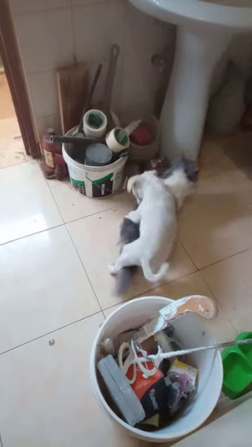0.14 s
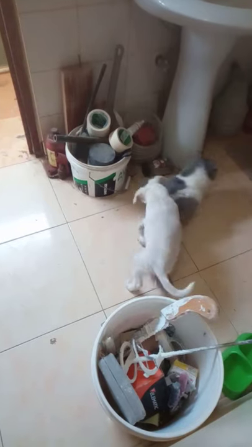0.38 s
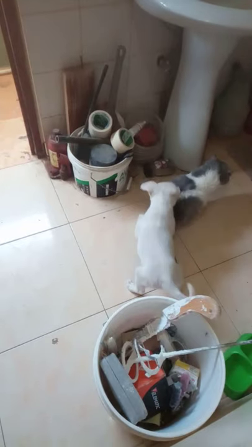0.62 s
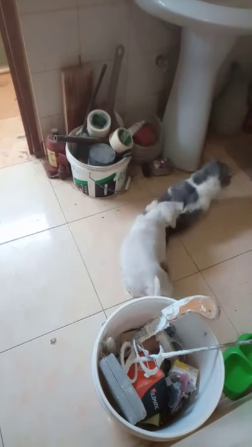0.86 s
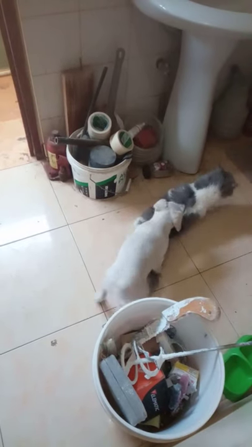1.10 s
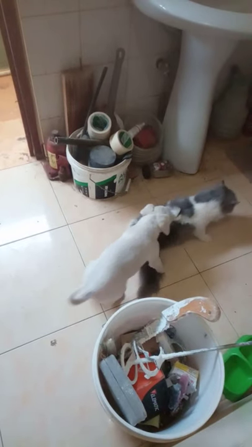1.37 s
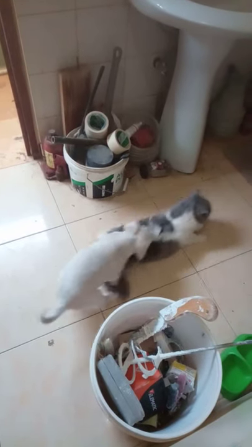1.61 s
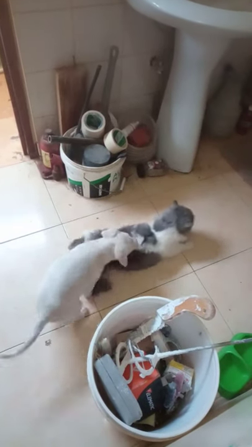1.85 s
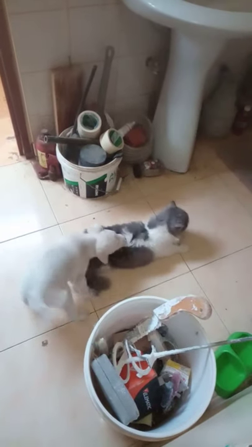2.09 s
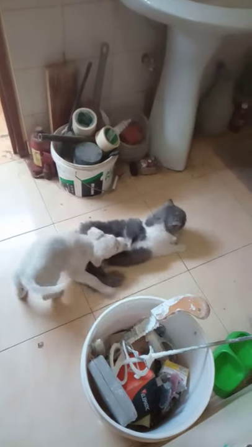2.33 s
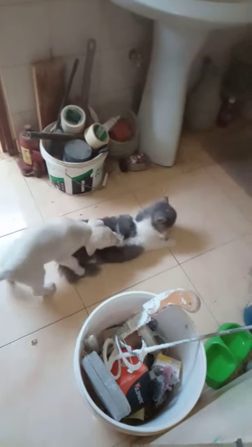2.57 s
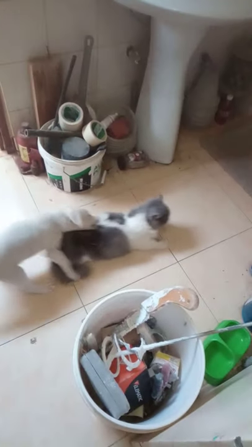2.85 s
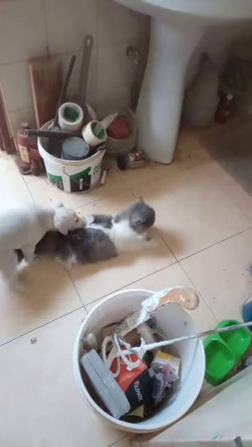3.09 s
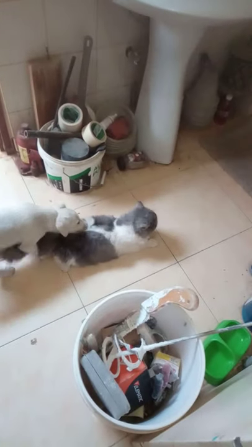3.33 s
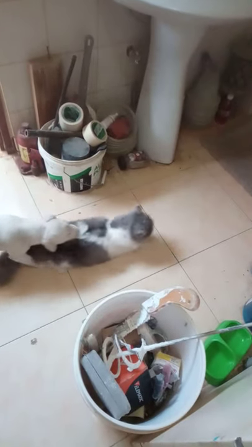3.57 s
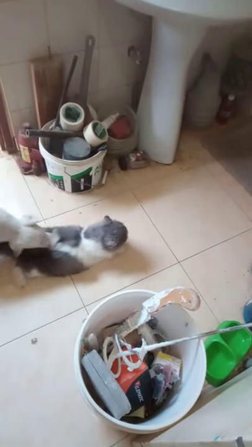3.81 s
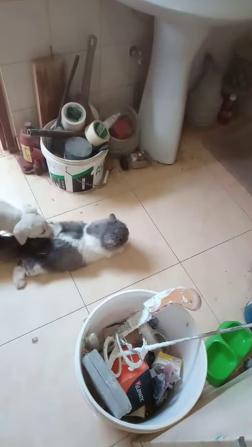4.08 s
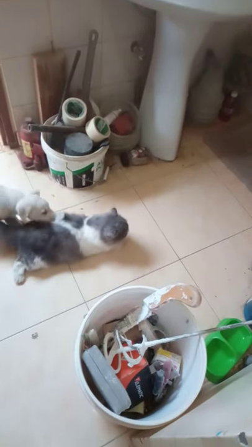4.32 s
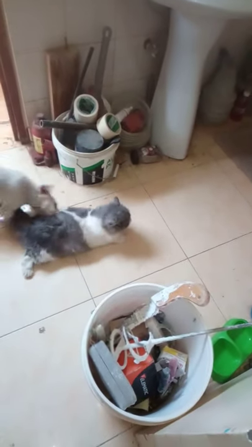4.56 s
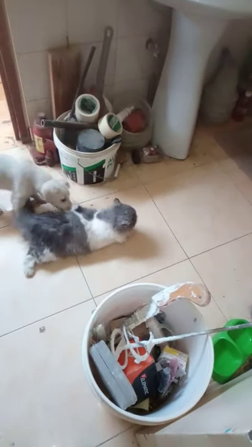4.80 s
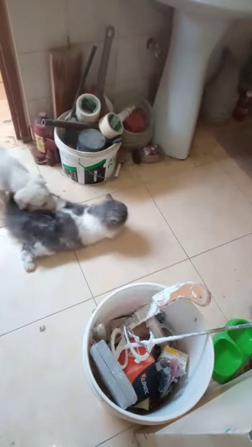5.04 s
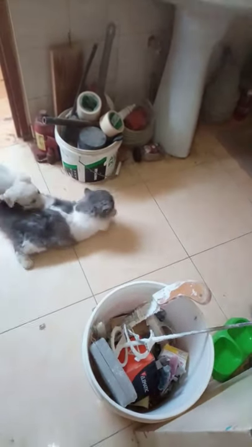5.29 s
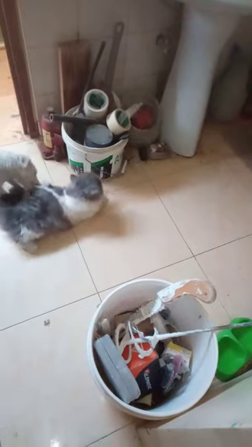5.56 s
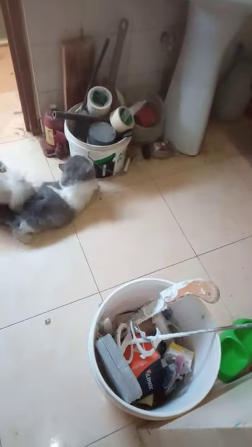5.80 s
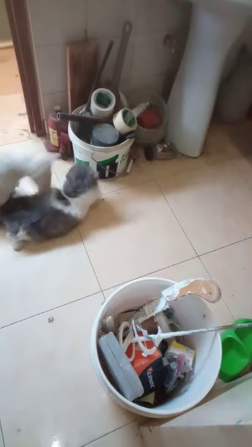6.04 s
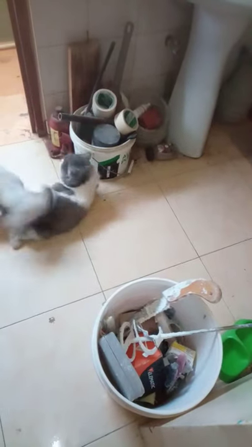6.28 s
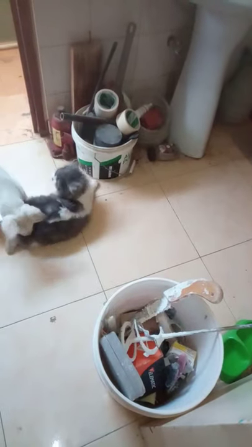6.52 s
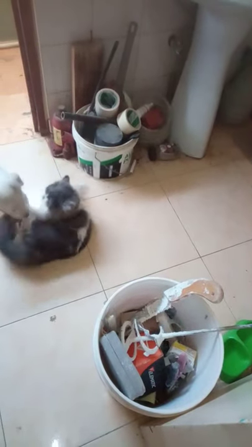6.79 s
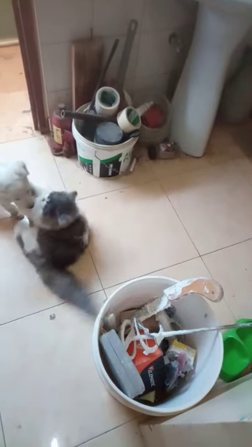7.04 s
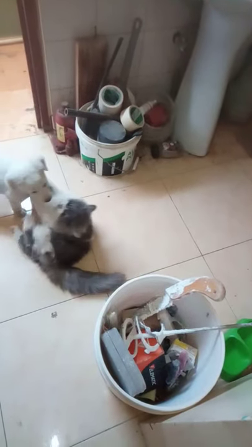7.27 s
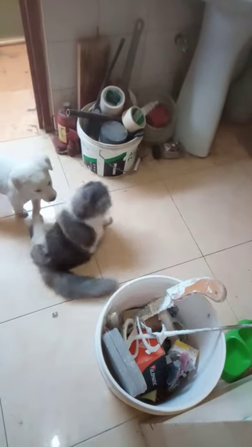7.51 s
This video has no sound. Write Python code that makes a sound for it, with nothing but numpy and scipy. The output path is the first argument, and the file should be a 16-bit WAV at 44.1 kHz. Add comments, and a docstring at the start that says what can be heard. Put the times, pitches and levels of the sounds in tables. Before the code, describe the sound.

Two drawn-out piercing cat yowls, the second longer and louder, with light scuffing on tiles and a low hum that drops out and returns.

```python
"""Small tiled washroom: a cat pestered by a puppy gives two long yowls, a step or two from a phone.
The yowls are harmonics of gliding, register-flipping folds shaped by throat, mouth and skull, plus room tail.
Paws scuff and tick on the tiles: shaped noise and short decaying sines; a few faint thin tones ring on.
An appliance next door drones through the room's low modes, pauses and starts again; hiss lies beneath."""
import sys
import numpy as np
from scipy import signal
from scipy.fft import rfft, irfft, next_fast_len
from scipy.io import wavfile
from scipy.ndimage import map_coordinates

SR = 44100
rng = np.random.default_rng(int(sys.argv[2]) if len(sys.argv) > 2 else 0)


def level_to_linear(level):
    """Convert decibel levels to linear amplitude factors, elementwise."""
    exponent = np.asarray(level, float) / 20
    return 10 ** exponent


def bounce(signal):
    """Save signal as a 16-bit WAV file at the path given by the first command-line argument."""
    frames = np.transpose(np.atleast_2d(signal))
    limited = np.clip(frames, -1, 1)
    pcm = np.round(limited * 32767).astype(np.int16)
    wavfile.write(sys.argv[1], SR, pcm)


N = 337100
t = np.arange(N) / SR


def curve(rows):
    """Columns of a time table, interpolated at every sample."""
    s, *columns = np.transpose(rows)
    return [np.interp(t, s, c) for c in columns]


def bumps(rows):
    """Sum of triangles (t/s, half length/s, height)."""
    return sum(height * np.maximum(1 - np.abs(t - s) / half, 0) for s, half, height in rows)


def walk(rate_hz, at_s=t):
    """Smooth chance of spread about 1 that changes about rate_hz times a second, 400 at most."""
    steps = rng.standard_normal(int(N / SR * 400) + 4)
    return map_coordinates(steps, [at_s * min(rate_hz, 400)], order=2)


def unit(x):
    """Scale to rms 1."""
    return x / np.sqrt(np.mean(x ** 2))


def peak(at_hz, hz, width_hz):
    """Steep resonance: a two-pole peak passed five times; width_hz is that of one pass."""
    detune = (at_hz ** 2 - hz ** 2) / ((at_hz + 1) * width_hz)
    return (1 + detune ** 2) ** -2.5


def noise(gain):
    """Noise of rms 1 with the spectrum gain(Hz)."""
    size = next_fast_len(N)
    at_hz = np.arange(size // 2 + 1) * SR / size
    spectrum = rfft(rng.standard_normal(size)) * gain(at_hz)
    return unit(irfft(spectrum, size)[:N])


def colour(points):
    """Gain function of (f/Hz, level/dB) points, straight in log frequency."""
    hz, db = np.transpose(points)
    return lambda at_hz: level_to_linear(np.interp(np.log(at_hz + 1), np.log(hz), db))


def modes(rows):
    """Gain function of (f/Hz, one-pass width/Hz, level/dB) resonances."""
    return lambda at_hz: sum(level_to_linear(db) * peak(at_hz, hz, width_hz) for hz, width_hz, db in rows)


def roughness():
    """Hoarseness of the folds, 0-1: nearly clear but for moments at onsets, flips and the end."""
    # t/s, half length/s, added roughness
    hoarse_rows = [(1.0, .3, .55), (1.21, .1, .45), (1.36, .15, .2), (1.49, .04, .5), (1.55, .06, .55),
                   (1.77, .08, .3), (2.2, .3, .12), (2.65, .3, .45), (3.44, .14, .85), (3.645, .03, .8),
                   (3.72, .1, .12), (3.8, .045, .5), (5.3, .08, .12), (5.87, .06, .35), (6.68, .1, .25)]
    clear_rough = 0.07
    return np.minimum(clear_rough + bumps(hoarse_rows), 1)


def folds(rough):
    """Vocal folds: pitch/Hz and phase/rad, with jitter that grows with roughness."""
    # pitch of the folds, one table per yowl, steps are register flips: t/s, f/Hz
    pitch_rows = [
        [(.87, 308), (1.09, 296.3), (1.15, 376.5), (1.24, 418.5), (1.27, 495.7), (1.39, 453.2), (1.47, 467.5),
         (1.485, 693), (1.52, 711), (1.605, 790), (1.69, 786.7), (1.775, 657), (1.84, 604), (2.08, 587.3),
         (2.36, 482.3), (2.57, 346.6), (2.66, 322)],
        [(3.32, 269.3), (3.38, 277), (3.43, 367.7), (3.49, 689.6), (3.53, 734), (3.61, 814.4), (3.632, 799.5),
         (3.64, 615.7), (3.74, 619.3), (3.79, 679.7), (3.8, 630), (3.84, 623.2), (3.94, 592.4), (4.1, 534),
         (4.29, 470), (4.61, 479.6), (4.76, 466.3), (4.8, 452.1), (4.99, 436), (5.03, 451), (5.22, 457.7),
         (5.36, 519.2), (5.56, 536.6), (5.73, 514.5), (5.81, 490), (5.89, 448.7), (6.0, 444), (6.06, 463),
         (6.12, 481), (6.28, 475.4), (6.33, 492.3), (6.53, 500.4), (6.585, 483.6), (6.61, 438), (6.635, 391),
         (6.72, 375.4)],
    ]
    (hz,) = curve(sum(pitch_rows, []))
    jitter = 0.0047 * walk(40) + 0.062 * rough * walk(300)
    return hz, 2 * np.pi * np.cumsum(hz * (1 + jitter)) / SR


def tract_gains(hz, mouth_db, throat_hz, throat_db, ring_hz, ring_db, hop):
    """Throat, mouth and skull resonances: gain of each harmonic re mouth level, every hop samples."""
    # level of the fundamental: t/s, level/dB
    first_rows = [(.87, -63), (.94, -41), (1.0, -57), (1.08, -38), (1.15, -62.5), (1.35, -71), (1.46, -54),
                  (1.55, -68), (1.62, -49), (1.7, -50.5), (1.82, -67), (2.1, -56), (2.4, -60), (2.57, -61),
                  (2.66, -81), (3.32, -50), (3.38, -52), (3.43, -69), (3.55, -50), (3.63, -49), (3.66, -66),
                  (3.9, -70.5), (4.1, -58.5), (4.4, -54), (4.82, -63), (4.9, -72.5), (5.17, -76.5),
                  (5.22, -57.5), (5.5, -59), (5.85, -59), (5.95, -66.5), (6.1, -55), (6.5, -67.5),
                  (6.65, -62), (6.72, -75)]
    # opening of the mouth: t/s, resonance f/Hz, palate shoulder level/dB re mouth
    mouth_rows = [(.87, 1950, -5), (1.2, 1780, -25), (1.3, 1950, -9.5), (1.45, 2185, -9.5), (1.56, 2260, 0),
                  (1.69, 2380, -3), (1.75, 2220, -11.5), (1.9, 2380, -12), (2.08, 2130, -20),
                  (2.4, 1790, -9.5), (2.66, 1860, -16.5), (3.32, 2000, -3), (3.43, 1960, -15.5),
                  (3.53, 2220, 4), (3.6, 2430, -14), (3.64, 2418, 0), (3.69, 2290, -12.5),
                  (3.76, 2450, -0.5), (3.87, 2320, -12.5), (4.03, 1884, -9), (4.44, 1981, -19.5),
                  (4.8, 1830, -9), (4.92, 1920, -16), (5.0, 2272, -17), (5.22, 2290, -19.5),
                  (5.3, 2330, -4.5), (5.37, 2110, -2.5), (5.47, 2420, -5.5), (5.62, 2300, -6.5),
                  (5.82, 1960, -23), (5.93, 2200, -9.5), (6.04, 2340, -9), (6.11, 1960, -17.5),
                  (6.27, 1905, -27.5), (6.33, 2250, -7.5), (6.4, 2050, -14.5), (6.5, 2000, -31),
                  (6.72, 1876, -28)]
    # upper ring of the skull: multiple of its resonance, one-pass width/Hz, level/dB before scaling
    ring_rows = [(1, 1170, 15), (1.401, 880, -24.5), (1.62, 1487, -19.5)]
    mouth_width_hz = 1166
    palate_hz, palate_width_hz = 3058, 1295  # shoulder above the mouth resonance
    hollow_hz, hollow_width_hz = 4700, 3200  # dip below the skull ring
    throat_spread, throat_shut_hz = 1.7, 400

    (first_db,) = curve(first_rows)
    mouth_hz, palate_db = curve(mouth_rows)
    # the dip deepens with effort above -50 dB and as the ring climbs above 6 kHz
    hollow_db = -25 - 0.1243 * (mouth_db + 50) - 11.5 * (ring_hz - 6000) / 1000
    first_db = first_db - mouth_db + 1.8 * walk(12)
    throat_db = throat_db - mouth_db + 2.5 * walk(12)
    palate_db = palate_db + 1.4 * walk(12)
    hollow_db = hollow_db + 3.2 * walk(12)

    partials_hz = np.arange(2, 27)[:, None] * hz[hop]
    # narrow with lips shut at a low resonance, wider as they open
    throat_width_hz = throat_spread * np.maximum(throat_hz[hop] - throat_shut_hz, 100)
    ring = sum(level_to_linear(db) * peak(partials_hz, share * ring_hz[hop], width_hz)
               for share, width_hz, db in ring_rows)
    groups = [
        (peak(partials_hz, throat_hz[hop], throat_width_hz), throat_db),
        (peak(partials_hz, mouth_hz[hop], mouth_width_hz), np.zeros(N)),
        (peak(partials_hz, palate_hz, palate_width_hz), palate_db),
        (peak(partials_hz, hollow_hz, hollow_width_hz), hollow_db),
        (ring, ring_db),
    ]
    # each group's harmonics together have rms 1 before its level
    overtones = sum(g / np.sqrt(np.sum(g ** 2, axis=0) / 2) * level_to_linear(db[hop]) for g, db in groups)
    return np.vstack([np.sqrt(2) * level_to_linear(first_db)[hop], overtones])


def harmonics(phase, gains, rough, hop):
    """Sum of sines; each overtone wavers on its own as the head turns; hoarse folds smear it."""
    tone = np.zeros(N)
    for k, gain in enumerate(gains):
        flutter_db = 2.0 * walk(25, t[hop]) + 2.73 * walk(70, t[hop])
        # turbulence
        smear = 1 - 0.5 * rough[hop] + 0.51 * rough[hop] * walk(400, t[hop])
        level = np.interp(t, t[hop], gain * level_to_linear(flutter_db) * smear)
        tone += level * np.sin((k + 1) * phase + 0.85 * k)
    return tone


def breath(skull_db):
    """Breath noise at the top of the band, lifted by the microphone port; follows the skull ring."""
    top_hz, width_hz, re_skull_db = 15100, 1500, -32
    level = level_to_linear(re_skull_db + skull_db + 2.0 * walk(20))
    return level * noise(lambda at_hz: peak(at_hz, top_hz, width_hz))


def lingering_fold():
    """After the second yowl's drop in pitch one fold lingers in the high register, sagging in pitch."""
    # overtones: multiple, level/dB re linger
    linger_orders = [(1, 0), (2, -7.5), (3, -1.5), (4, 2), (5, 8)]
    at_s, half_s, level_db = 3.66, 0.12, -51.5
    start_hz, sag_hz_per_s = 800, 300  # start_hz holds at at_s
    hz = (start_hz - sag_hz_per_s * (t - at_s)) * (1 + 0.012 * walk(150))
    phase = 2 * np.pi * np.cumsum(hz) / SR
    tone = sum(level_to_linear(db + 2.6 * walk(60)) * np.sin(round(k) * phase) for k, db in linger_orders)
    return bumps([(at_s, half_s, level_to_linear(level_db))]) * tone


def cat():
    """Two yowls: harmonics of jittery folds through the tract, breath and a lingering high fold."""
    # effort, heard as the level of the mouth resonance, one table per yowl: t/s, level/dB
    effort_rows = [
        [(.87, -79), (1.09, -76.5), (1.22, -76.5), (1.26, -59.5), (1.36, -51.5), (1.45, -55), (1.52, -42.5),
         (1.58, -39), (1.61, -39), (1.69, -38.5), (1.72, -36.5), (1.78, -43.5), (1.84, -39), (1.9, -34.5),
         (1.96, -40.5), (1.98, -56), (2.04, -44), (2.17, -48), (2.36, -61), (2.57, -71.5), (2.66, -84)],
        [(3.32, -76.5), (3.43, -52), (3.49, -43), (3.6, -30.5), (3.635, -36), (3.67, -28), (3.77, -39.5),
         (3.81, -38.5), (3.85, -36), (3.92, -51), (4.1, -55.5), (4.29, -52.5), (4.44, -35), (4.61, -60.5),
         (4.8, -53.5), (4.89, -48), (4.99, -49), (5.07, -38), (5.22, -31), (5.31, -35), (5.37, -32),
         (5.47, -34.5), (5.6, -27.5), (5.73, -44), (5.89, -50), (5.97, -35.5), (6.0, -46), (6.04, -34),
         (6.08, -39.5), (6.13, -34), (6.18, -42), (6.23, -33), (6.28, -39), (6.33, -34), (6.5, -46.5),
         (6.55, -47.5), (6.62, -61), (6.65, -58.5), (6.72, -84.5)],
    ]
    # tract: t/s, throat f/Hz, throat level/dB, skull ring f/Hz, skull ring level/dB re mouth
    tract_rows = [(.87, 600, -74, 5700, -3), (.94, 585, -54, 5670, -13), (1.09, 640, -57, 5900, -26),
                  (1.2, 820, -67, 5700, -21), (1.28, 995, -60, 6100, -25), (1.4, 947, -59, 6570, -16.5),
                  (1.52, 929, -56, 6270, -20), (1.62, 800, -62.5, 5860, -28.5),
                  (1.78, 948, -61, 6920, -25.5), (1.86, 1210, -51, 6600, -21.5),
                  (2.1, 750, -61.5, 6650, -21.5), (2.36, 1080, -53.5, 5840, -15),
                  (2.5, 960, -62.5, 5700, -40), (2.66, 813, -70.5, 5676, -30),
                  (3.32, 579.3, -61, 6000, -12.5), (3.38, 630, -53.5, 6000, -12),
                  (3.46, 972, -51.5, 6400, -27), (3.58, 790, -53.5, 5840, -25),
                  (3.7, 878.5, -59, 6550, -22.5), (3.8, 1079, -50.5, 6750, -25),
                  (3.92, 1210, -53, 7040, -19.5), (4.04, 1110, -57.5, 6650, -5.5),
                  (4.29, 1200, -50, 5450, -16), (4.44, 1025, -48, 6280, -19.5),
                  (4.61, 1115, -57, 5600, -15), (4.78, 1000, -49, 5060, -21.5),
                  (5.05, 1050, -46.5, 6014, -16.5), (5.3, 1100, -48, 6250, -18),
                  (5.5, 1075, -40, 6450, -16.5), (5.72, 1035, -53, 6600, -17.5),
                  (5.85, 1344, -47.5, 5730, -20.5), (5.95, 1235, -42, 6520, -12),
                  (6.05, 1286, -41.5, 6490, -14.5), (6.13, 1060, -52, 6830, -20),
                  (6.24, 1300, -51.5, 6850, -23), (6.35, 1099, -46, 6840, -18.5),
                  (6.5, 997, -47, 6810, -34), (6.58, 1130, -50.5, 5800, -41),
                  (6.62, 1150, -47.5, 5750, -41), (6.65, 1100, -70, 5700, -41),
                  (6.72, 1073, -85, 5700, -32.5)]
    (mouth_db,) = curve(sum(effort_rows, []))
    throat_hz, throat_db, ring_hz, ring_db = curve(tract_rows)
    hop = slice(0, N, 64)
    rough = roughness()
    hz, phase = folds(rough)
    gains = tract_gains(hz, mouth_db, throat_hz, throat_db, ring_hz, ring_db, hop)
    tone = harmonics(phase, gains, rough, hop)
    voiced = np.zeros(N)
    for yowl in effort_rows:
        start_s, end_s = yowl[0][0], yowl[-1][0]
        voiced += np.interp(t, [start_s - 0.02, start_s, end_s, end_s + 0.0042], [0, 1, 1, 0])
    level = level_to_linear(mouth_db + 1.6 * rough * walk(90))
    return voiced * (level * tone + breath(mouth_db + ring_db) + lingering_fold())


def room(x):
    """Hard tiles: a dense noise tail of unit energy whose treble dies first."""
    t60_s, treble_t60_s, build_up_s = 0.47, 0.085, 0.013
    age_s = t[:SR // 2]
    grain = rng.standard_normal(len(age_s)) * np.minimum(age_s / build_up_s, 1)
    low = signal.sosfilt(signal.butter(1, 3000, fs=SR, output="sos"), grain)
    tail = low * level_to_linear(-60 * age_s / t60_s) + (grain - low) * level_to_linear(-60 * age_s / treble_t60_s)
    return signal.fftconvolve(x, tail / np.sqrt(np.sum(tail ** 2)))[:N]


def ringing_sines(rows):
    """Sines (t/s, peak level/dB, f/Hz, t60/s) that start at once and decay exponentially."""
    out = np.zeros(N)
    for s, db, hz, t60_s in rows:
        start = int(s * SR)
        age_s = np.maximum(t[start:start + SR // 2] - s, 0)
        out[start:start + len(age_s)] += level_to_linear(db - 60 * age_s / t60_s) * np.sin(2 * np.pi * hz * age_s)
    return out


def paws():
    """Fur and paws dragged on tiles: grainy rubbing noise and thin claw ticks."""
    # drags on the tiles: t/s, half length/s, peak level/dB
    scuff_rows = [(.2, .2, -79.5), (0.43, 0.091, -78), (0.81, .1, -76), (2.75, 0.38, -75),
                  (2.957, 0.15, -92), (3.294, 0.15, -78.5), (6.85, 0.077, -85), (7.25, 0.28, -77.5),
                  (7.5, 0.085, -84)]
    # rubbing spectrum before scaling to rms 1: f/Hz, density/dB per Hz
    scuff_tone = [(240, -24.5), (400, 1), (480, -15), (780, -10), (1500, -19), (1700, -15.5), (5320, -23.5),
                  (7290, -36.5), (9480, -66), (16000, -120)]
    # claw ticks: t/s, peak level/dB, f/Hz
    claw_rows = [(0.1944, -88, 12500), (0.2159, -75, 14800), (0.595, -67, 15100), (0.9744, -89.5, 13400),
                 (2.9268, -66.5, 12600), (3.214, -75, 12010), (3.2958, -80.5, 9270)]
    claw_t60_s = 0.012
    swells = bumps([(s, half_s, level_to_linear(db)) for s, half_s, db in scuff_rows])
    rubbing = swells * level_to_linear(2.0 * walk(74)) * noise(colour(scuff_tone))
    return rubbing + ringing_sines([(*claw, claw_t60_s) for claw in claw_rows])


def thin_tones():
    """A few faint thin tones, the last one, near 2 kHz, ringing on after the second yowl."""
    # t/s, peak level/dB, f/Hz, t60/s
    thin_rows = [(.42, -70, 1450, .15), (.82, -73, 3310, .6), (.8, -76, 2650, .1), (6.81, -63, 1990, .3)]
    return ringing_sines(thin_rows)


def drone():
    """Motor rumble heard only through the narrow low modes of the room; each group throbs on its own."""
    # t/s, main mode level/dB, lower modes level/dB re main, upper modes level/dB re main
    drone_rows = [(0, -47.5, -12, -2), (.08, -57.5, -12, 2.5), (.18, -44.5, -12, -0.5),
                  (.33, -52, -4.5, -0.5), (.45, -59, 5, 2), (.7, -61, -9, -3.5), (.85, -44.5, -10, 3.5),
                  (1.1, -59, 1.5, -4), (1.5, -51, -3, 4.5), (1.9, -51.5, -8, -4), (2.2, -55.5, 5, 5.5),
                  (2.6, -55, 0, -2), (3.02, -57, -3, 1), (3.15, -62, -1, -5.5), (3.25, -37.5, 1.5, -17),
                  (3.4, -54, 6.5, -10.5), (3.58, -66, 12, 0), (3.68, -82, -4, 5.5), (5.72, -83, 3, 9),
                  (5.79, -48.5, -8, -18.5), (5.93, -36, -16, -15.5), (6.05, -44, -3, 3.5),
                  (6.25, -42, -11, -11.5), (6.7, -44.5, -8, -6), (6.77, -51.5, -4, -2),
                  (6.84, -41.5, -4.5, -11.5), (7.05, -50.5, -5.5, -2), (7.64, -47.5, -4.5, -8)]
    # room modes, levels before scaling to rms 1: f/Hz, one-pass width/Hz, level/dB
    lower_modes = [(66, 51, -9.5), (90.7, 10, 8.5)]
    main_mode = [(119.9, 17, 0)]
    upper_modes = [(143.8, 19, 6), (171.8, 18, 2.5), (205.1, 16, 0), (238.8, 13, 2), (266, 54, -11),
                   (301.4, 16, -4), (361.3, 25, -19), (186, 345, -11)]
    throb_db, throbs_per_s = 2, 9.0
    main_db, lower_db, upper_db = (db + throb_db * walk(throbs_per_s) for db in curve(drone_rows))
    hum = np.sin(2 * np.pi * main_mode[0][0] * t + 0.5 * walk(3))
    main = 0.62 * noise(modes(main_mode)) + 1.25 * hum
    lower = level_to_linear(lower_db) * noise(modes(lower_modes))
    knock = level_to_linear(2.6 * walk(18))
    upper = level_to_linear(upper_db) * knock * noise(modes(upper_modes))
    return level_to_linear(main_db) * (main + lower + upper)


def hiss():
    """Steady coloured noise whose level wavers slowly."""
    # spectrum before scaling to rms 1: f/Hz, density/dB per Hz
    hiss_tone = [(30, 7), (100, 6), (300, 4), (600, -2), (2000, -17), (6000, -21), (8000, -29.5),
                 (12000, -28), (14000, -24), (15000, -25), (15700, -34.5)]
    level_db = -72.5
    return level_to_linear(level_db + 3.0 * walk(5.4)) * noise(colour(hiss_tone))


def scene():
    """Cat with its room, paws, thin tones, drone and hiss."""
    direct_db, room_db = -3, -8
    voice = cat()
    yowls = level_to_linear(direct_db) * voice + level_to_linear(room_db) * room(voice)
    return (yowls + paws() + thin_tones() + drone() + hiss())[None]


def low_pass(x):
    """Removes everything above the highest recorded frequency."""
    return signal.sosfilt(signal.butter(12, 15700, fs=SR, output="sos"), x)


def record(dry):
    """The phone takes the finished mix."""
    return low_pass(dry)


dry = scene()
out = record(dry)
bounce(out)
```